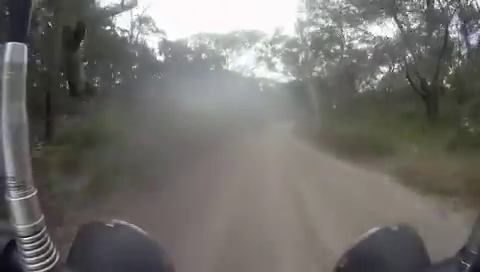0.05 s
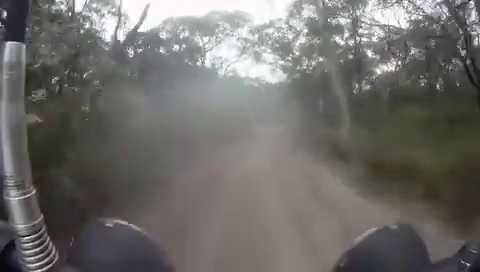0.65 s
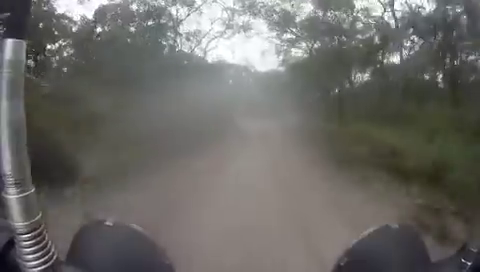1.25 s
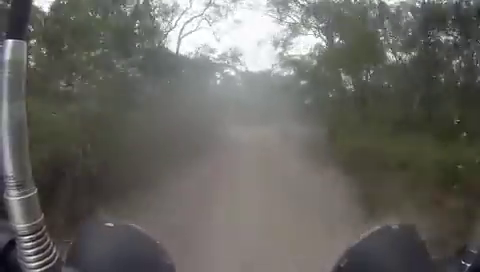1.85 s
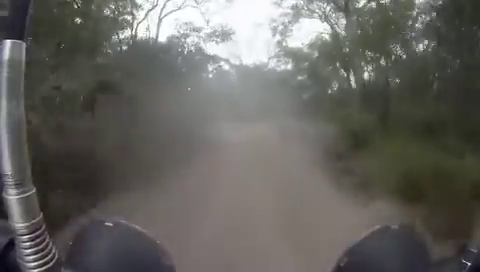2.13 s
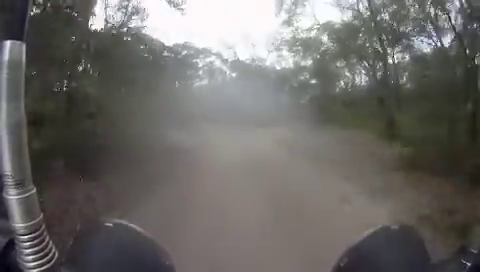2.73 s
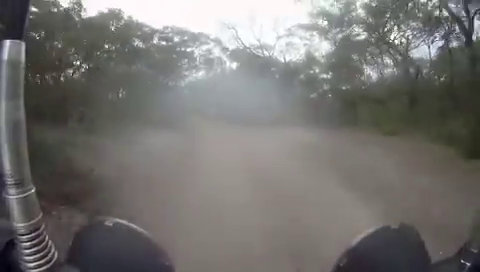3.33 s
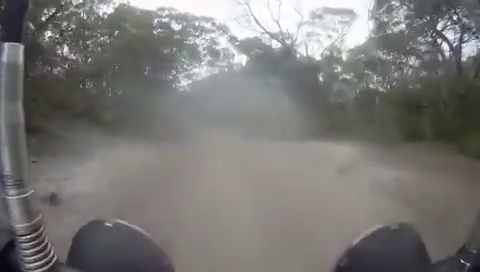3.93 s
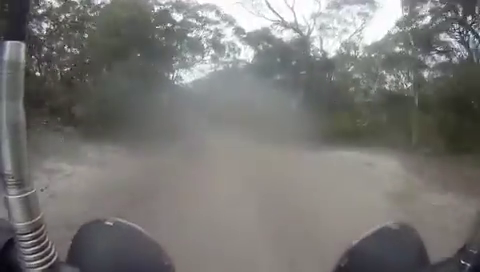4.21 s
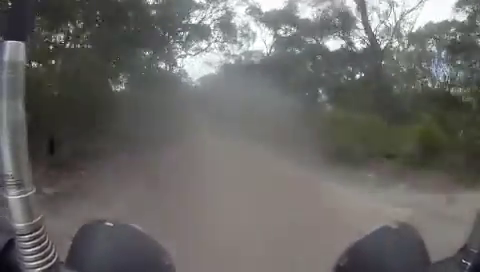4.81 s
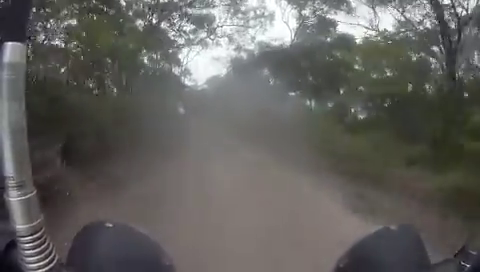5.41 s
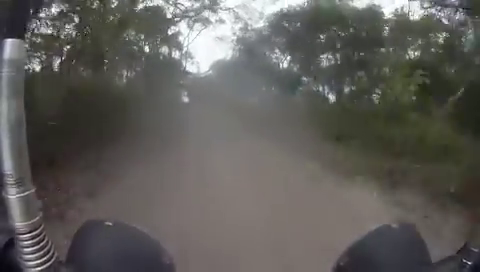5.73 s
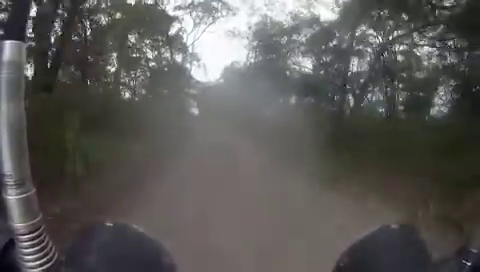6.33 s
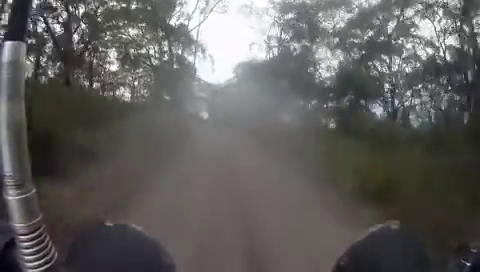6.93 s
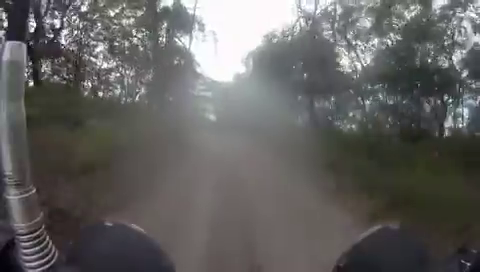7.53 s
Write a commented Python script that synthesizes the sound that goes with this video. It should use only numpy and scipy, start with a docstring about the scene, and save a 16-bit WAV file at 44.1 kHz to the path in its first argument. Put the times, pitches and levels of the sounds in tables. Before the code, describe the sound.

A four-wheel-drive travels along a dirt track, heard close up from a plastic housing on its front bar. A low rumble of engine, tyres and buffeting air runs throughout, with a faint whine and the light, high chatter of a small loose part. The engine eases around 1 second, pulls a little harder from 3 to 4, eases again and picks up after 6.

The housing slams right at the start with a sharp crack and a deep thump, then three more times between 1.1 and 1.4 seconds. Further slams land at about 3, 3.7, 4.1, 5.4 and 6.1 seconds. These are the loudest sounds. Lighter, irregular clacks fall between them, thickest from 3.4 to 4.7 seconds. After the last slam, only the rumble and the small rattle continue until the end at about 7.5 seconds.

```python
"""A four-wheel-drive rolls along a dirt track, heard close up from a microphone in a plastic housing
on its front bar. Engine, driveline and tyres rumble up through the mount while a small loose part
chatters without rest. Right at the microphone, the housing clacks in the play of its hinge on bumps,
and on the worst ones it slams against a stop with a deep thump."""
import sys
import numpy as np
from scipy import signal
from scipy.io import wavfile

SR = 44100
rng = np.random.default_rng(int(sys.argv[2]) if len(sys.argv) > 2 else 0)


def file_out(sig):
    """Save sig as 16-bit WAV at sys.argv[1]."""
    # one column per channel
    cols = np.atleast_2d(sig).T
    # limit, then scale
    lim = np.clip(cols, -1, 1)
    pcm = np.round(lim * 32767).astype(np.int16)
    wavfile.write(sys.argv[1], SR, pcm)


N = 333386
TIME = np.arange(N) / SR

# Levels in the tables are relative; each source adds its own gain.
# engine speed: time_s, firing_hz
ENGINE_SPEED = [(0, 65), (.35, 63.5), (.7, 58), (1.4, 57), (3.1, 66.3), (4.15, 66.5), (4.6, 62),
                (5.7, 60.8), (6.3, 67.2), (7, 68), (7.56, 64.5)]
# tones of firing and gears: multiple of the firing rate, and the matching level_db
ENGINE_ORDERS = [1, 2, 16.9, 33.2]
ORDER_LEVELS = [-1.5, -3, -12, -16]
# roughness of the track, as the level of what it shakes: time_s, buffet_db, drone_db, tyre_db
TRACK_ROUGHNESS = [(0.0, -32.5, -31.5, -38), (0.46, -44.5, -38, -41.5), (1.01, -42, -37.5, -42),
                   (1.3, -42, -32, -42.5), (1.47, -38, -35, -42), (2.42, -44, -38.5, -41),
                   (2.92, -38.5, -36, -41.5), (3.18, -43.5, -36.5, -40), (3.64, -35, -36, -41),
                   (5.07, -46.5, -35.5, -41), (5.96, -50, -29.5, -41), (6.11, -42, -31, -41.5),
                   (6.53, -44, -36.5, -39), (6.89, -51, -34.5, -39), (7.56, -39.5, -35, -40)]
# slams against the stop: start_s, crack_db, seating_delay_s, thump_db, thump_hz, ring_db, ride_change_db
STOP_SLAMS = [(.0093, -4.5, 0.0021, -3.5, 101, -20, -7.5), (1.0826, -7.5, 0.0036, -5.5, 104, -17.5, -2),
              (1.3076, -8.5, .0029, -8, 97, -20.5, 0), (1.4196, -4.5, .0023, -2, 84.5, -27.5, -15.5),
              (3.049, -8, 0.0033, -10, 91.5, -22, 2.5), (3.6625, -8, 0.0018, -8, 94, -13, 2),
              (4.092, -10, 0.0027, -6, 91, -29, 0), (5.4486, -7, 0.002, -2, 95, -17.5, -11),
              (6.0847, -6, 0.003, -2.5, 97, -21, 0.5)]
# how hard the loose part is shaken: time_s, level_db
SHAKING = [(0.0, -46), (0.15, -40), (0.72, -49), (0.81, -42), (0.99, -53.5), (1.38, -44), (1.47, -49),
           (1.95, -37.5), (2.16, -50), (2.4, -44), (2.61, -55.5), (2.76, -43.5), (3.63, -48.5), (3.9, -41),
           (5.22, -49), (5.34, -66), (5.4, -47.5), (6.12, -55), (6.33, -44.5), (6.54, -66), (6.69, -68),
           (6.78, -46.5), (7.08, -44), (7.17, -72), (7.26, -43.5), (7.41, -46), (7.56, -49.5)]
# clear clacks of the housing, mostly on single bumps, one a rebound just after a slam: start_s, level_db
BUMP_CLACKS = [(0.087, -23.5), (0.5871, -14.5), (0.706, -19.5), (1.143, -17), (1.1758, -18),
               (1.2356, -13.5), (1.3404, -20), (1.7709, -16), (1.872, -21.5), (2.044, -20.5), (2.0906, -19),
               (2.5391, -20.5), (2.7076, -21.5), (2.7652, -19), (2.829, -21.5), (3.058, -22), (3.3846, -20),
               (3.4997, -22.5), (3.58, -21), (3.6457, -16.5), (3.7848, -16), (4.0184, -19.5), (4.0815, -15),
               (4.1458, -18.5), (4.1935, -19.5), (4.262, -16.5), (4.3813, -22.5), (4.461, -19),
               (4.5844, -17.5), (4.6478, -22), (4.6987, -20.5), (5.3497, -24)]

# resonances: pitch_hz, width_hz, level_db
BUFFET_MODES = [(16.9, 8.3, 1), (30.8, 11.4, -2), (49.2, 41.6, -11)]  # air buffeting and chassis heave
FRONT_END_MODES = [(98.7, 4.8, 3), (122.1, 18.8, 4), (138.5, 23.6, 0.5), (265.4, 49, -15.5),
                   (461, 124, -26)]  # the vehicle's front end, just behind the microphone
HOUSING_MODES = [(451, 230, -10.5), (609, 185, -2.5), (793, 106, 0.5), (902, 113, 0.5), (1106, 177, 2.5),
                 (1799, 500, -8), (2021, 340, -5.5), (2237, 280, -3), (2730, 130, -9.5), (3687, 430, -11),
                 (5330, 80, -21), (6350, 210, -24), (8290, 380, -16.5), (9710, 750, -16.5),
                 (10900, 250, -17), (11850, 37, -29), (12000, 40, -15), (12900, 270, -20),
                 (14220, 1100, -20)]  # the housing under steady shaking
PANEL_MODES = [(241.6, 11, -2.5), (305.3, 14, -5.5), (621, 37, -12), (783, 19, -18), (954, 15, -8),
               (1165.3, 37, -3)]  # panels and tubes that hum along
MOUNT_MODES = [(315, 134, -0.5), (495, 237, 0), (743, 140, 4), (1144, 167, 5.5), (1917, 243, 1.5),
               (2383, 240, -3.5), (2590, 88, -19), (3750, 130, -8), (4730, 220, -28), (7340, 500, -28),
               (8250, 120, -16), (9690, 530, -16.5), (10010, 200, -11), (10860, 240, -16),
               (11630, 92, -17.5), (12270, 43, -14), (13600, 400, -14), (14100, 420, -17)]  # mount and housing in a slam
HINGE_MODES = [(1172, 190, 5.5), (1910, 150, -2.5), (2223, 510, 1), (2560, 107, 2), (3910, 260, -8),
               (4800, 450, -38), (7400, 280, -26), (8140, 380, -14), (9450, 210, -9.5), (9650, 370, -11.5),
               (10720, 160, -11.5), (13400, 300, -14), (14350, 580, -14.5)]  # the hinge that clacks
LOOSE_PART_MODES = [(2240, 1830, 1), (3657, 610, 6.5), (4717, 930, 9.5), (5090, 170, -1.5),
                    (6814, 510, 2.5), (7084, 760, 6), (8180, 280, -4)]  # the small part that chatters


def from_db(db):
    """Decibels to gain."""
    return 10 ** (np.asarray(db) / 20)


def unit_rms(x):
    """Scale to unit power."""
    return x / np.sqrt(np.mean(x ** 2) + 1e-20)


def curves(rows):
    """Each column of a table over time, at every sample."""
    time_s, *columns = np.transpose(rows)
    return [np.interp(TIME, time_s, column) for column in columns]


def drift(rate_hz):
    """A smooth random wander of unit power, mostly slower than rate_hz."""
    step, settle = 40, 2000
    pole = np.exp(-2 * np.pi * rate_hz * step / SR)
    noise = rng.standard_normal(N // step + settle + 2)
    slow = signal.lfilter([1], [1, -2 * pole, pole * pole], noise)[settle:]
    return np.interp(np.arange(N) / step, np.arange(len(slow)), unit_rms(slow))


def resonate(force, modes):
    """Parallel resonances, each applied twice so that the valleys stay dark."""
    sound = 0
    for pitch_hz, width_hz, level_db in modes:
        r = np.exp(-np.pi * width_hz / SR)
        gain = (1 - r * r) / 2
        section = [gain, 0, -gain, 1, -2 * r * np.cos(2 * np.pi * pitch_hz / SR), r * r]
        sound = sound + from_db(level_db) * signal.sosfilt([section, section], force + 1e-18)
    return sound


def strike(force, modes):
    """Ring the modes, scaled so that a unit click peaks at 1."""
    click_response = resonate(signal.unit_impulse(SR // 10), modes)
    return resonate(force, modes) / np.abs(click_response).max()


def clicks(start_s, heights):
    """One-sample blows at the given times."""
    samples = np.clip(np.round(start_s * SR).astype(int), 0, N)
    return np.bincount(samples, heights, N + 1)[:N]


def scrape(blows, length_s):
    """Rough faces keep scraping, ever less, for some milliseconds after each blow."""
    fade = np.sqrt(np.linspace(1, 0, int(length_s * SR) + 2))
    return signal.lfilter(fade / np.linalg.norm(fade), [1], blows) * rng.standard_normal(N)


def driveline(cruise_hz=64, cruise_db=-40.5, load_db_per_hz=1.4, tread_db=-53.5, waver_hz=2):
    """Firing, gear whine and tread hum follow one shaft speed; the engine swells as it pulls faster."""
    firing_hz, = curves(ENGINE_SPEED)
    engine_db = cruise_db + load_db_per_hz * (firing_hz - cruise_hz)
    phase = 2 * np.pi * np.cumsum(firing_hz * (1 + .002 * drift(6))) / SR
    tones = 0
    for order, level_db in zip(ENGINE_ORDERS, ORDER_LEVELS):
        strength = from_db(level_db - 1.15 * drift(waver_hz))
        tones = tones + strength * np.sin(order * phase + rng.uniform(0, 2 * np.pi))
    tread = from_db(tread_db + 6 * drift(waver_hz)) * np.sin(2.735 * phase)
    return np.sqrt(2) * (from_db(engine_db) * tones + tread)


def rolling():
    """The rough ground shakes chassis, front end, housing and panels at random."""
    buffet_db, drone_db, tyre_db = curves(TRACK_ROUGHNESS)
    noise = rng.standard_normal((4, N))
    gusts = noise[0] * from_db(2 * drift(rate_hz=17))
    lumps = noise[1] * from_db(2 * drift(rate_hz=5.3))
    gravel = noise[2] * from_db(1.34 * drift(rate_hz=43))
    heave = from_db(buffet_db + 10.5) * unit_rms(resonate(gusts, BUFFET_MODES))
    drone = from_db(drone_db + 1) * unit_rms(resonate(lumps, FRONT_END_MODES))
    housing = from_db(tyre_db + 1) * unit_rms(resonate(gravel, HOUSING_MODES))
    panels = from_db(tyre_db - 7.5) * unit_rms(resonate(noise[3], PANEL_MODES))
    return heave + drone + housing + panels


def housing_slams(edge_db=-0.5, seating_db=-11.5, scrape_db=-3.5, rattle_db=-10.5, swing_delay_s=.00056):
    """The housing hits its stop edge first, seats and rattles; the whole mount swings and rings out."""
    start_s, crack_db, seating_delay_s, thump_db, thump_hz, ring_db, _ = np.transpose(STOP_SLAMS)
    blows = clicks(start_s, from_db(crack_db))
    seating = clicks(start_s + seating_delay_s, from_db(crack_db + seating_db))
    scraping = from_db(scrape_db) * scrape(blows, length_s=.006)
    crack = strike(from_db(edge_db) * blows + seating + scraping, MOUNT_MODES)
    rattle = slam_dips() * strike(from_db(rattle_db) * scrape(blows, length_s=.019), HINGE_MODES)
    swing_s = start_s + swing_delay_s
    thump = 0
    for k, pitch_hz in enumerate(thump_hz):
        push = clicks(swing_s[[k]], -from_db(thump_db[[k]]))
        thump = thump + strike(push, [(pitch_hz, 105, 0)])  # wide, so it dies quickly
    ring = strike(clicks(swing_s, -from_db(ring_db)), [(123.2, 22, 0)])
    # the heavy mount follows only the slow part of the blow
    swing = signal.sosfilt(signal.butter(2, 205, fs=SR, output="sos"), thump + ring)
    return crack + rattle + swing


def slam_dips(deepest_s=0.039):
    """A gain that dips quickly after the hardest slams and recovers more slowly; a few others lift it."""
    change_db = 0
    for start_s, *_, ride_change_db in STOP_SLAMS:
        age = np.maximum(TIME - start_s, 0) / deepest_s
        change_db = change_db + ride_change_db * (age * np.exp(1 - age)) ** 3
    return from_db(change_db)


def bounces(landing_s, level_db, gap_s=.003, loss_db=3.0, scatter_db=3.24):
    """Each landing is followed by three quick, fading bounces."""
    chance = rng.uniform(-1, 1, (len(landing_s), 2, 4))
    gaps_s = gap_s * (1 + .5 * chance[:, 0])
    start_s = landing_s[:, None] + np.cumsum(gaps_s, axis=1) - gaps_s[:, :1]
    heights = from_db(level_db[:, None] + scatter_db * chance[:, 1] - loss_db * np.arange(4))
    return clicks(start_s.ravel(), heights.ravel())


def loose_part(hop_s=.025, landing_db=16.5, scatter_db=5, scrape_db=-13.5, tremble_s=.024, tremble_db=-12):
    """A small part hops in flurries, landing as hard as it is shaken, and trembles lightly in between."""
    flight, force, tremor = rng.uniform(-1, 1, (500, 3)).T
    landing_s = np.cumsum(hop_s * np.exp(.48 * flight))
    shake_db = curves(SHAKING)[0] + 1.5 * drift(rate_hz=6)  # the drift makes the flurries
    blows = bounces(landing_s, np.interp(landing_s, TIME, shake_db) + landing_db + scatter_db * force)
    hops = strike(blows + from_db(scrape_db) * scrape(blows, length_s=.0019), LOOSE_PART_MODES)
    touch_s = np.cumsum(tremble_s * np.exp(tremor))
    touches = bounces(touch_s, np.zeros_like(touch_s))
    trembling = unit_rms(resonate(touches, LOOSE_PART_MODES))
    return hops + from_db(shake_db + tremble_db) * trembling


def hinge_clacks(tap_db=2.0, scrape_db=-6.5, light_per_s=2.5, light_db=-31, rough_until_s=5.3):
    """Bumps tip the housing through the play in its hinge; light tips fall at random on rough ground."""
    start_s, level_db = np.transpose(BUMP_CLACKS)
    tipped = (rng.random(N) < light_per_s / SR) & (TIME < rough_until_s)
    light_blows = tipped * from_db(light_db - 0.5 * rng.standard_normal(N))
    blows = clicks(start_s, from_db(level_db)) + light_blows
    scraping = from_db(scrape_db) * scrape(blows, length_s=.0026)
    return strike(from_db(tap_db) * blows + scraping, HINGE_MODES)


def scene():
    """The ride as heard at the front bar, in mono, with the close knocks of the housing on top."""
    ride = driveline() + rolling() + loose_part()
    return (slam_dips() * ride + hinge_clacks() + housing_slams())[None]


def record(dry, notch_hz=6020, notch_width_hz=900, ceiling=1.37, cutoff_hz=15400):
    """The closed housing cancels a narrow treble band; the recorder rounds peaks and cuts the top."""
    hollow = signal.lfilter(*signal.iirnotch(notch_hz, notch_hz / notch_width_hz, fs=SR), dry)
    rounded = ceiling * np.tanh(hollow / ceiling)
    return signal.sosfilt(signal.ellip(10, .2, 90, cutoff_hz, fs=SR, output="sos"), rounded)


dry = scene()
out = record(dry)
file_out(out)
```